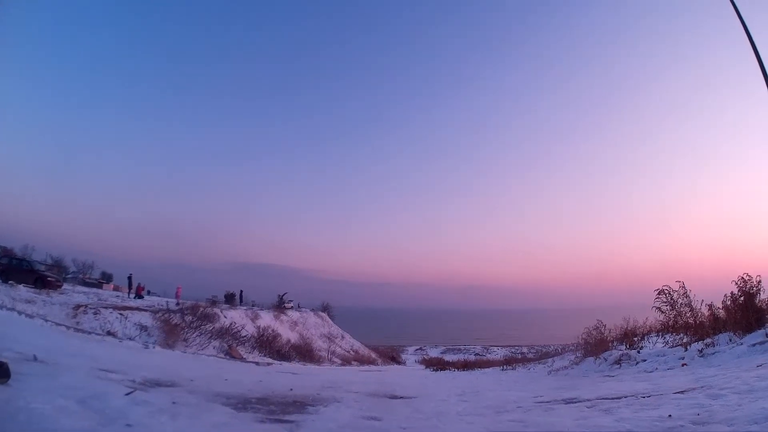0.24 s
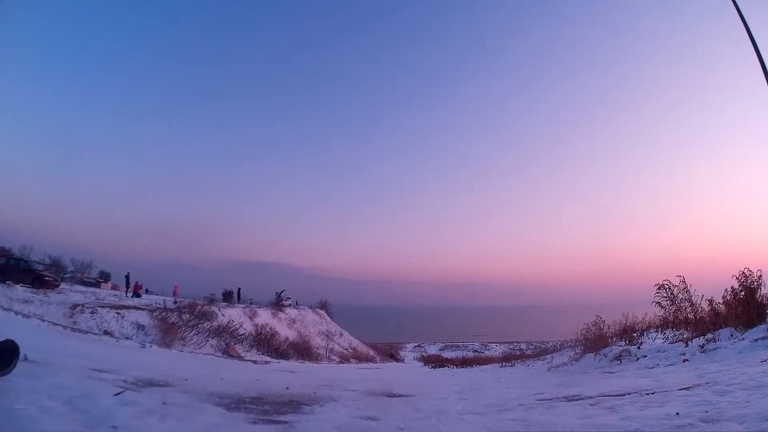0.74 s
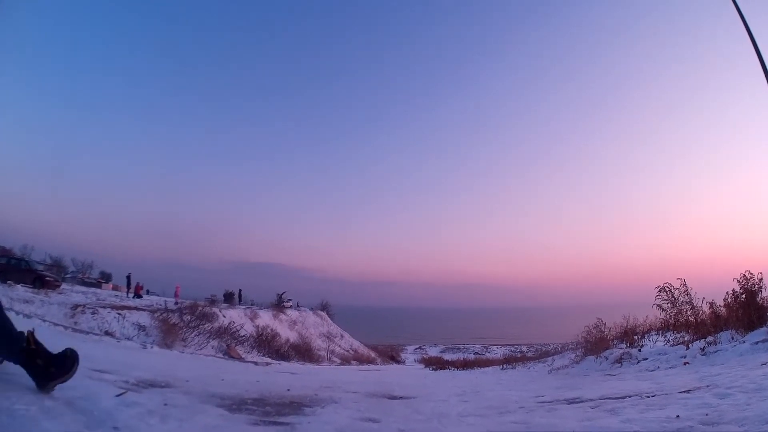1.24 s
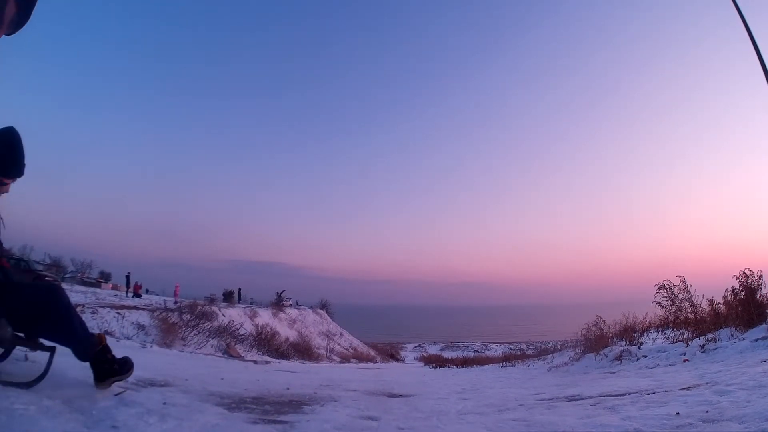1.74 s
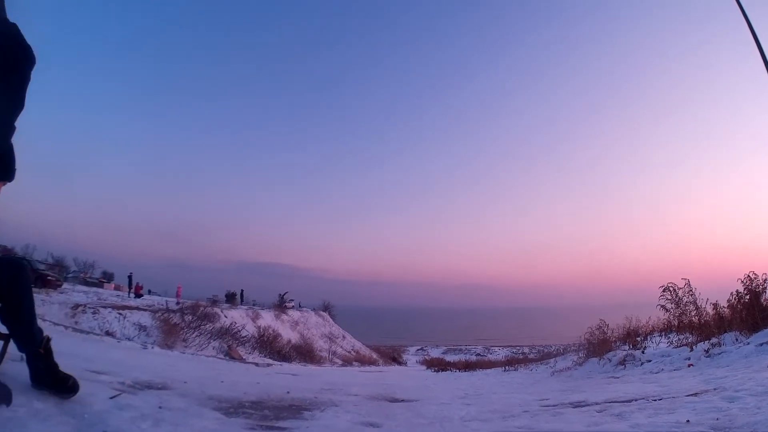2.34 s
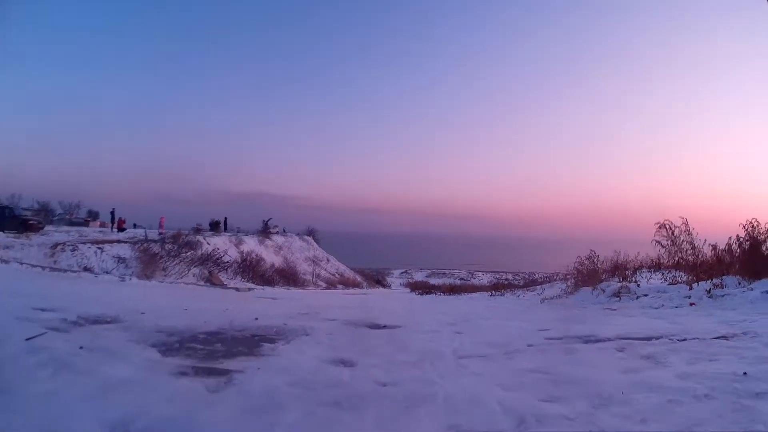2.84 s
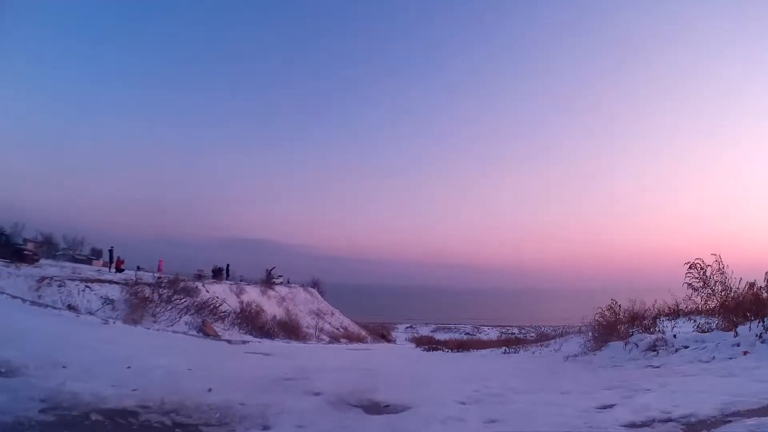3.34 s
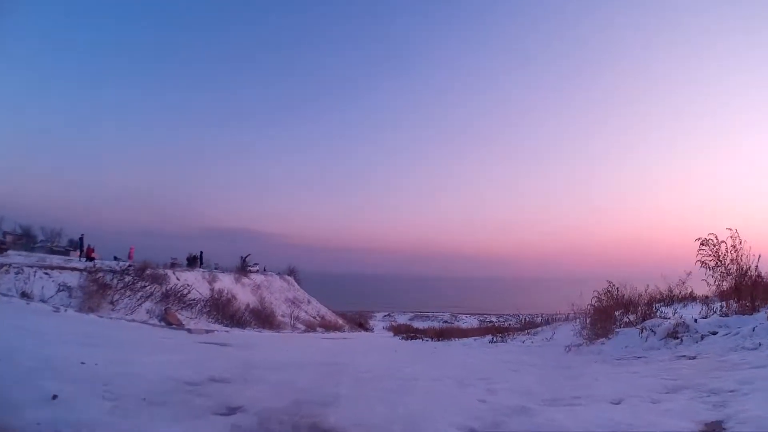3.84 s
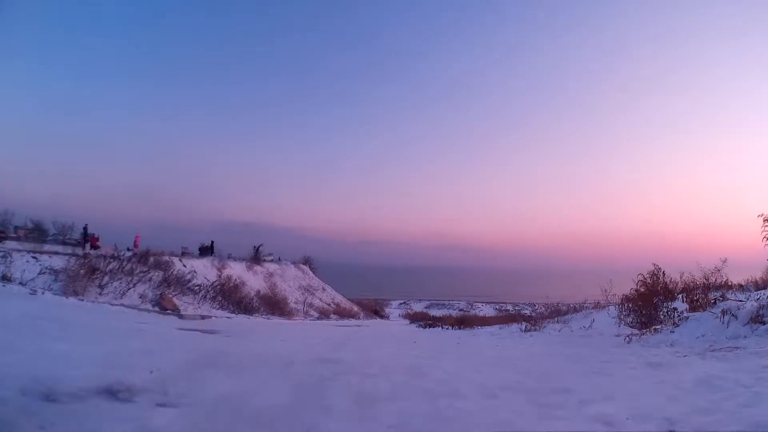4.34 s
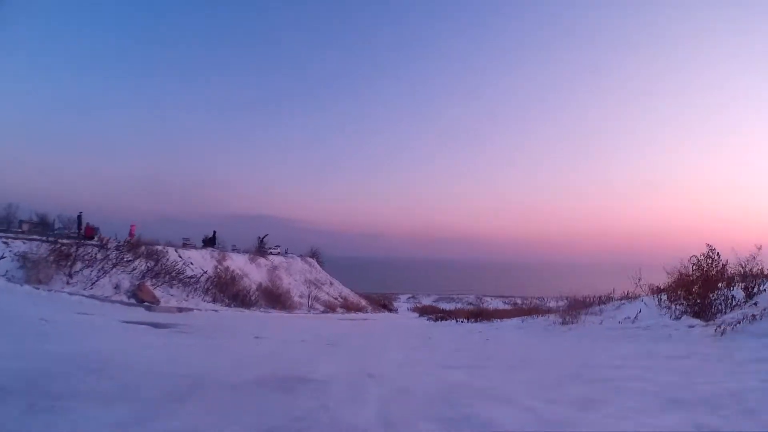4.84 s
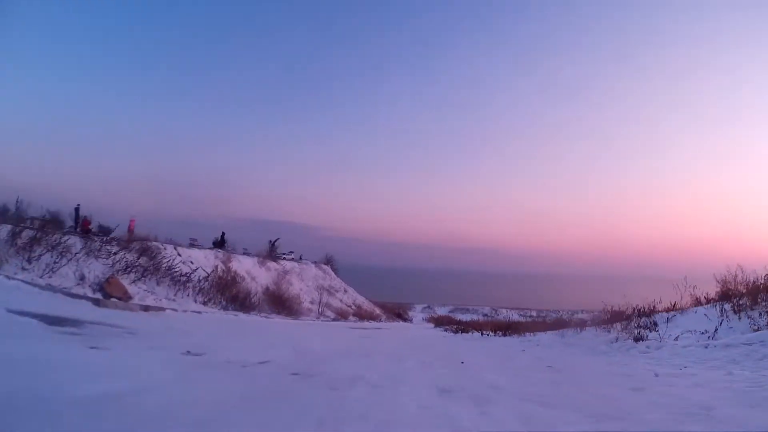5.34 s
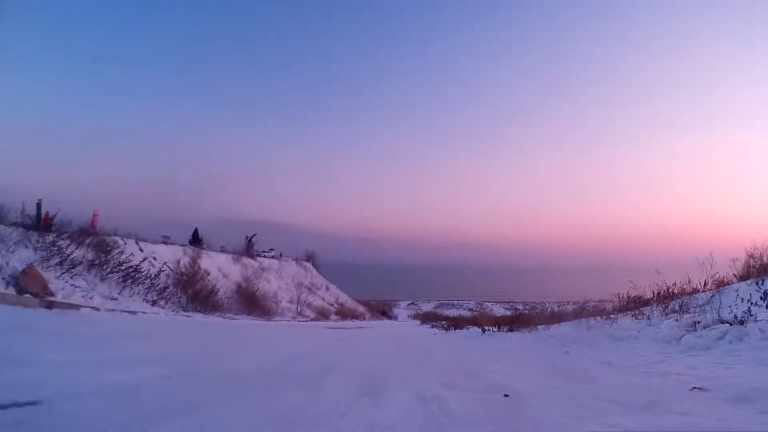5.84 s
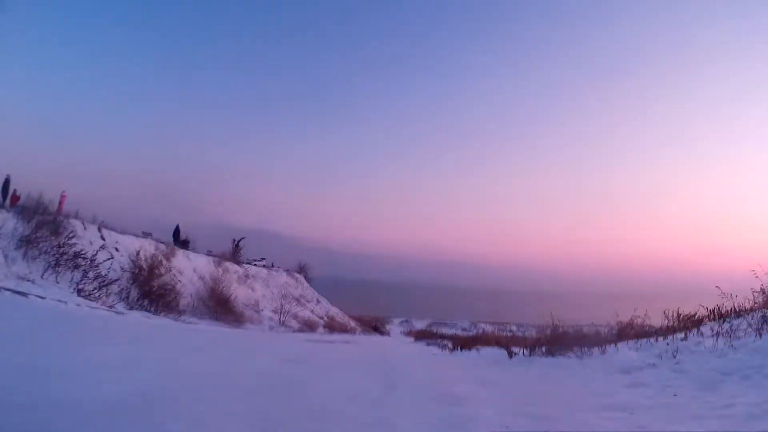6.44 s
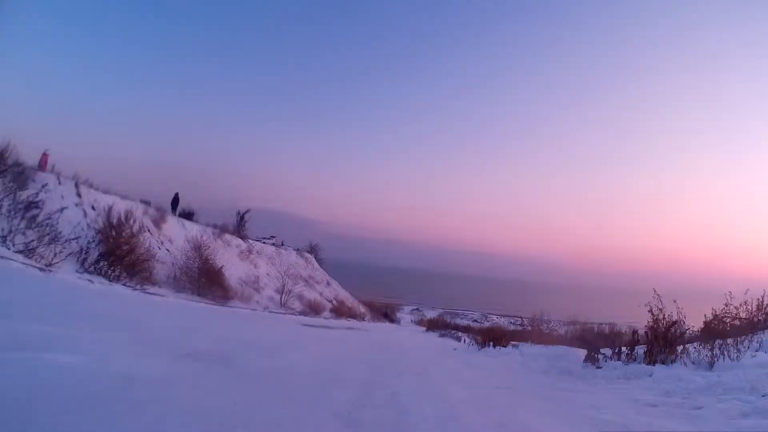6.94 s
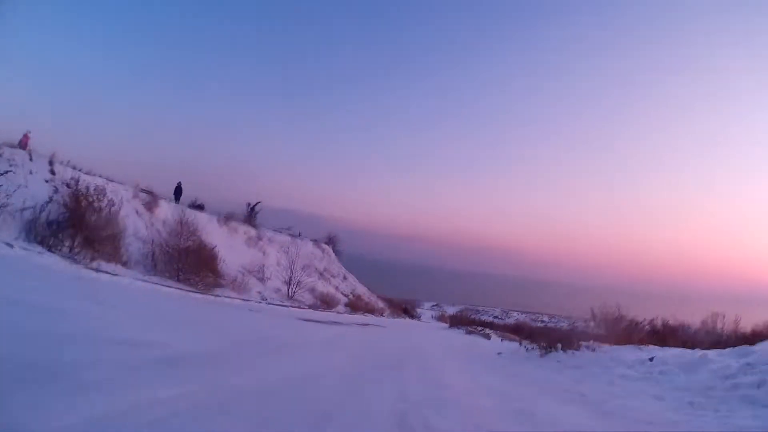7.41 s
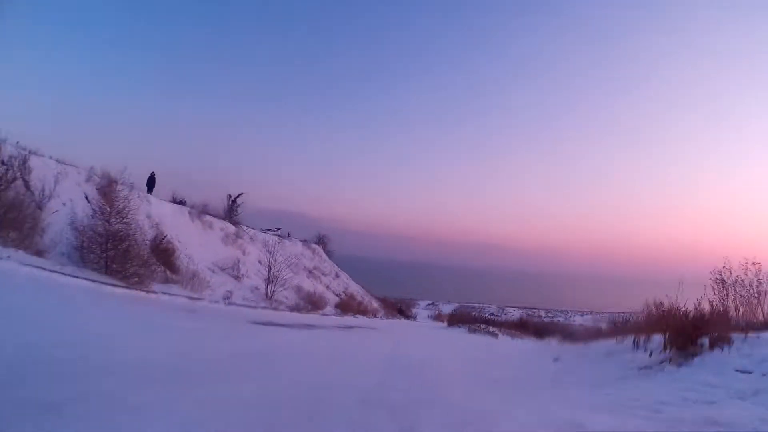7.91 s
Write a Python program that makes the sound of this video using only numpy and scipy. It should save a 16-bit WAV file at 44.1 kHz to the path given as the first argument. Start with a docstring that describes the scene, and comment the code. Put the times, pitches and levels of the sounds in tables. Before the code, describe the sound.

Dry, very close sound carried through a sled on packed snow. From 0 to 2.3 s it stands nearly silent: a crunchy double knock with a hollow low tone right at the start, a short scuff at 0.3, a small scrape at 0.7, a dull knock near 1.0, a tiny squeak at 1.2, soft low taps around 1.4 and 2.05, faint frame hum and hiss. At 2.4 s the push-off scrapes, dips, then swells into a coarse, creaky rasp peaking around 3.0. It drops by 3.35, and bumps begin. From 4 s crust lumps crunch and snap over the steady mid-pitched runner scrape, with low seat thumps, strong near 5.2. From 6 s to 8.2 s the run is rough and loud: flickering rasp, dense irregular crunches, heavy thumps, brief deep sway, gritty icy treble and bright overloaded splashes, cut off while still sliding.

```python
"""Runners rasp on packed snow: random grain fractures excite the resonances of a sled that carries the microphone.
The sled is nudged and knocked, pushed off at 2.3 s, and runs down a slope.
Lumps of crust crunch as bursts of fractures; ruts thump the seat as short enveloped sines, and light knocks
ring as decaying tones. Grinding ice adds treble, low sway swells briefly, and the hardest blows add a bright
splash as the microphone overloads."""
import sys
import numpy as np
from scipy import signal
from scipy.fft import rfft, irfft, next_fast_len
from scipy.io import wavfile
from scipy.ndimage import uniform_filter1d

SR = 44100
rng = np.random.default_rng(int(sys.argv[2]) if len(sys.argv) > 2 else 0)


def master(y):
    """Save y as 16-bit WAV."""
    cut = np.clip(np.atleast_2d(y).T, -1, 1)
    pcm = np.round(cut * 32767)  # scale
    wavfile.write(sys.argv[1], SR, pcm.astype(np.int16))


N = 360297
TIME = np.arange(N) / SR   # seconds

# Levels in the tables are relative: each body adds its own gain.
# Steady scrape, from standing through the push to the run: [time_s, level_db]
SCRAPE = [(0.0, -45), (0.62, -50.5), (0.86, -64.5), (1.1, -52), (1.5, -52), (1.7, -62), (2.17, -60.5),
          (2.38, -27.5), (2.54, -39.5), (2.72, -28.5), (3.0, -21), (3.22, -23.5), (3.34, -38),
          (4.45, -33.5), (5.3, -31.5), (6.6, -28), (8.17, -29.5)]
# Brightness and liveliness of the scrape, which mostly grows during the run: [time_s, liveliness_share]
LIVELINESS = [(0.0, 0.25), (0.62, 0.15), (0.72, 0.22), (0.85, 0.2), (2.2, 0.2), (3.0, 0.13), (4.0, 0.45),
              (5.0, 0.52), (6.5, 0.52), (8.17, 0.64)]
# Brief drags of the runners, when nudged or on a rough patch: [start_s, level_db, length_s]
RUNNER_DRAGS = [(0.303, -43.5, 0.24), (0.672, -35.5, 0.045), (0.973, -46.5, 0.055), (1.18, -44, .015),
                (2.582, -22.5, 0.022), (3.505, -21, 0.052), (4.66, -31.5, 0.19), (5.586, -22.5, 0.12),
                (6.056, -22, 0.035)]
# Knocks on the standing sled and big lumps under the running one:
# [start_s, crunch_db, crunch_length_s, deck_against_runners_db, thump_db]
KNOCKS_AND_BIG_LUMPS = [(0.008, -36.5, 0.019, -3, -15), (0.09, -33, 0.014, -5.5, -28),
                        (0.16, -58, 0.009, -5, -21), (0.962, -48.5, .006, -8, -22),
                        (0.984, -44.5, .005, 2.5, -23.5), (1.412, -47, .008, -7, -38.5),
                        (1.444, -39, .01, -10, -48), (2.003, -45.5, 0.003, 3, -15.5),
                        (2.049, -45, 0.024, -4.5, -26.5), (2.423, -38, 0.0068, -5, -16.5),
                        (2.862, -17.5, 0.01, -5.5, -30.5), (3.289, -34, 0.006, 0, -13),
                        (3.45, -31, 0.019, -5, -8), (3.496, -22.5, 0.003, 0.5, -26),
                        (3.563, -21, .028, -2.5, -25), (3.763, -23, 0.0033, -11, -19.5),
                        (3.842, -33.5, .005, 3.5, -16), (3.969, -33, 0.025, 1.5, -14.5),
                        (4.048, -26, 0.015, -4.5, -15), (4.082, -21.5, 0.062, -4.5, -26),
                        (4.127, -12, 0.0065, -3, -21), (4.18, -13.5, 0.016, -13.5, -8),
                        (4.402, -22.5, 0.023, -4, -20.5), (4.553, -24.5, .023, 1, -16.5),
                        (4.595, -21.5, 0.028, -9, -14.5), (4.663, -21.5, .013, -7.5, -13.5),
                        (4.734, -18, .01, -12.5, -13.5), (4.861, -19, 0.0034, 7.5, -6.5),
                        (4.932, -27, 0.017, -8, -21), (4.982, -30.5, 0.0055, -5, -11),
                        (5.051, -22, 0.0028, 3, -20), (5.076, -19.5, 0.026, -4, -26),
                        (5.192, -14, 0.012, -9.5, -2), (5.272, -13.5, 0.0041, -3.5, -4.5),
                        (5.527, -18.5, 0.024, -7, -6), (5.784, -25.5, 0.0027, -15, -28),
                        (5.916, -22.5, 0.0077, -3.5, -6.5), (5.985, -23, .004, -1, -17),
                        (6.02, -23.5, 0.053, -3.5, -9.5), (6.106, -13.5, 0.0052, -10.5, -12.5),
                        (6.195, -35, 0.0044, -14, -6), (6.26, -26, .008, -11, -9),
                        (6.348, -18, 0.0032, 0, -13), (6.376, -21, 0.051, -2.5, -6.5),
                        (6.481, -10, 0.0051, -7.5, -5), (6.56, -27, 0.0034, 10, -9),
                        (6.616, -16.5, 0.034, -6.5, -13), (6.656, -11.5, 0.0041, -5.5, -3.5),
                        (6.774, -13.5, 0.019, -9.5, -8), (6.822, -10.5, 0.0033, -3.5, -21),
                        (6.879, -25.5, .01, -2.5, -12), (6.931, -21, 0.021, -4, -9),
                        (7.012, -21, .004, 1, -12), (7.065, -15.5, 0.013, -4, -13.5),
                        (7.12, -22, 0.03, -5.5, -7.5), (7.174, -17, 0.0096, -3.5, 0.5),
                        (7.227, -34.5, 0.015, 5, -8), (7.284, -16.5, 0.0053, -3.5, -18.5),
                        (7.314, -21, 0.01, -4.5, -27), (7.42, -16, .016, -1, 1),
                        (7.55, -20, 0.011, -0.5, -10.5), (7.643, -17, 0.0051, 0, -16),
                        (7.669, -19.5, 0.017, -3, -26), (7.701, -10.5, 0.0041, -9.5, -8.5),
                        (7.809, -32, .012, 0, -6.5), (7.846, -15.5, 0.0027, -0.5, -3.5),
                        (7.931, -14, 0.0053, -9, -4), (8.02, -24, 0.0047, 5, -12.5),
                        (8.155, -22.5, 0.0042, 8.5, -26)]
# Light knocks and a squeak on the standing sled: [start_s, level_db (before decay), pitch_hz, t60_s]
LIGHT_KNOCKS = [(0.147, -21.5, 224, 0.24), (0.561, -43, 88, 0.84), (0.698, -54, 220, 0.15),
                (0.987, -29, 228, 0.24), (1.178, -29.5, 1250, 0.054), (1.18, -53, 733, 0.7),
                (1.29, -45, 100, 0.29), (1.409, -30, 85, 0.24), (1.533, -39, 79, 0.55),
                (1.533, -30, 217, 0.2), (2.06, -26.5, 87, 0.22)]
# Low sway near 43 Hz, swelling briefly at irregular moments, often around knocks: [start_s, level_db, length_s]
SWAY_SWELLS = [(0.01, -32.5, 0.18), (0.296, -42.5, 0.16), (0.97, -30.5, .04), (2.034, -36, 0.042),
               (2.41, -32, .05), (2.87, -30, 0.33), (3.47, -25, 0.072), (3.958, -25.5, 0.057),
               (4.307, -27.5, 0.069), (4.6, -27.5, 0.13), (5.5, -21, 0.037), (6.311, -19.5, 0.069),
               (6.65, -22.5, .04), (7.24, -18.5, 0.042), (7.416, -22, .03), (7.67, -19, 0.043),
               (7.93, -21.5, 0.073)]
# Ringing of the unloaded frame against the scrape: [time_s, level_db]
UNLOADED_FRAME = [(0.0, 3), (0.5, -2), (0.75, 3), (1.2, -9.5), (1.9, -2), (2.3, -2), (2.7, -16.5)]

# Resonances of the runners: [centre_hz, width_hz, level_db]
RUNNER_MODES = [(1134, 35, -12.5), (1214, 51, -5), (1310, 85, -2.5), (1425, 75, -1), (1577, 96, -1.5),
                (1612, 97, 0.5), (1737, 45, 1), (1807, 84, -8.5), (1960, 73, -18.5), (2123, 43, -21),
                (2554, 124, -22.5), (2905, 270, -28.5), (3460, 62, -29)]
# Resonances of the deck: [centre_hz, width_hz, level_db]
DECK_MODES = [(349, 91, -15), (501.4, 33.7, -0.5), (546, 56, -4.5), (654.4, 81, -6), (702.6, 38.5, -7),
              (861, 65, -17), (920, 40, -23.5)]
# Upper resonances of the runner tubes: [centre_hz, width_hz, level_db]
TUBE_MODES = [(2660, 210, 6.5), (2990, 120, 3.5), (3463, 350, 1.5), (4610, 190, -11.5), (5130, 250, -7),
              (5830, 400, -13)]
# Treble bands of fine grinding, ticking and overload clicks: [centre_hz, width_hz, level_db]
TREBLE_BANDS = [(3560, 1400, 5.5), (5220, 720, -2), (7330, 1460, -6), (9840, 1670, -9.5),
                (14500, 3100, -23.5)]
# Resonances that slow stick-slip sets singing: [centre_hz, width_hz, level_db]
CREAK_MODES = [(609, 140, -0.5), (718, 56, 1.5), (860, 55, -16.5), (943, 35, -9.5), (2660, 103, -14),
               (3720, 110, -26.5)]
# Hum of the empty frame until a rider's weight damps it: [centre_hz, width_hz, level_db]
HUM_MODES = [(221.8, 24, 0.5), (522, 9.1, -21.5), (586, 9, -30), (720.5, 22, -15.5), (1300, 19, -6.5),
             (1390, 11.3, -11.5), (1756, 94, -10.5)]
# Resonances of the seat: [centre_hz, width_hz, level_db]
SEAT_MODES = [(85.8, 32.6, 0.5), (120.2, 27.4, 0), (180.5, 94, -3.5), (194.2, 25.6, 2), (290, 174, -19)]
# The sled swaying on its runners: [centre_hz, width_hz, level_db]
SWAY_MODES = [(43.2, 13.7, 10.5), (64, 37, -11.5)]

# Small lumps come at random once the sled runs; relative levels at liveliness 1, lower below it
RUN_START_S, LUMPS_PER_S = 2.7, 9
LUMP_CRUNCH_DB, LUMP_THUMP_DB, LUMP_SPREAD_DB, LUMP_LIVELINESS_DB = -27, -16, 2.0, 9.5
LUMP_LENGTH_S, LUMP_DEPTH_DB = 0.0049, -4   # typical length; deck against runners
LUMP_OVER_SCRAPE_DB = 2.5   # least crunch above the scrape table, before the random spread
# A runner rides up each lump just before it gives way
LEAD_IN_S, LEAD_IN_DB = 0.011, -15.5
# Overload clicks reach full level above this force; for weaker blows they fall away steeply (dB per dB)
CLICK_FORCE_DB, CLICK_DB, CLICK_SLOPE, CLICK_LAG_S, CLICK_S = -1, -25, 2.07, 0.0022, 0.0032
# Seat pitch at liveliness 0, its drop at liveliness 1, and its random scatter as a log ratio
THUMP_HZ, THUMP_SAG_HZ, THUMP_SCATTER = 204, 43, 0.049
SHUDDER_LAG_S = 0.017
HISS_DB, OVERLOAD, CUTOFF_HZ = -71.5, .7, 15750   # hiss rms and clipping amplitude re full scale 1


def runners(glide, crush):
    """Forced resonance: gliding and crushing fractures both make the runners rasp."""
    pressure = np.hypot(from_db(-4.0) * glide, from_db(1.5) * crush)
    force = reflected(grains(per_s=2200, spread_db=3.5), delay_s=.0022, wander_db=3.0, share=0.67)
    return rub(pressure, RUNNER_MODES, force, span_s=0.019)


def small_lumps(liveliness):
    """Random impacts: minor lumps lie unevenly along the run, stronger with liveliness; columns as for the big lumps."""
    chance = rng.standard_normal((120, 4))
    s = RUN_START_S + (np.arange(len(chance)) + .4 * chance[:, 0]) / LUMPS_PER_S
    calmer_db = LUMP_LIVELINESS_DB * (np.interp(s, TIME, liveliness) - 1)
    pressed_db = np.interp(s, *np.transpose(SCRAPE)) + LUMP_OVER_SCRAPE_DB
    crunch_db = np.maximum(LUMP_CRUNCH_DB + calmer_db, pressed_db) + LUMP_SPREAD_DB * chance[:, 1]
    thump_db = LUMP_THUMP_DB + calmer_db + LUMP_SPREAD_DB * chance[:, 2]
    length = LUMP_LENGTH_S * np.exp(.5 * chance[:, 3])
    depth_db = np.full(len(s), LUMP_DEPTH_DB)
    return np.column_stack([s, crunch_db, length, depth_db, thump_db])[s < TIME[-1]]


def deck(glide, deck_push, liveliness):
    """Structural transmission: lumps reach up into the hollow deck, which feels a lively glide slightly more."""
    pressure = np.hypot(from_db(-10.5 + 1.1 * liveliness) * glide, from_db(0.95) * deck_push)
    force = reflected(grains(per_s=1400, spread_db=2.5), delay_s=.0032, wander_db=3.0, share=0.61)
    return rub(pressure, DECK_MODES, force, span_s=0.026)


def crystals(glide, crush, liveliness, unloaded):
    """Fracture noise: grinding ice rings the tubes, most freely when empty; returns tubes and treble force."""
    load = np.hypot(glide, from_db(1.0) * crush)
    force = reflected(grains(per_s=4000, spread_db=0.0), delay_s=.0015, wander_db=3.0, share=0.36)
    freedom = np.hypot(1, from_db(4.5) * unloaded)
    tubes = resonate(from_db(-28.5) * load * freedom * force, TUBE_MODES)
    # liveliness strengthens both the grinding and the ticking spray
    grind = from_db(-29.5) * load * liveliness * grains(per_s=1400, spread_db=2.0)
    spray_level = from_db(-53.5) * liveliness ** 3 * from_db(4.5 * drift(12))
    spray = spray_level * grains(per_s=140, spread_db=3.0)
    return tubes, grind + spray


def overload_clicks(jolts):
    """Overload: the hardest blows add a short bright splash as the microphone overloads; fine ticks follow any blow."""
    s, crunch_db, length, _, thump_db = jolts.T
    force_db = 20 * np.log10(2 * from_db(crunch_db) + from_db(thump_db))
    click_db = CLICK_DB + CLICK_SLOPE * np.minimum(force_db - CLICK_FORCE_DB, 0)
    click_s = s + length / 2 + CLICK_LAG_S
    click = bursts(click_s, click_db, CLICK_S, rise_s=.0012, release_s=.00095)
    ticks = bursts(s, -56.5 + 0.47 * force_db, 0.045, rise_s=.012, release_s=.014)
    splash = from_db(-12.5) * click * grains(per_s=4100, spread_db=0.0)
    return splash + ticks * grains(per_s=200, spread_db=5.1)


def creak(glide, liveliness):
    """Stick-slip friction: cold snow catches a slow runner; this fades as the scrape grows lively."""
    sticking = from_db(-7.0 - 19.3 * liveliness)
    return rub(glide * sticking, CREAK_MODES, grains(per_s=900, spread_db=3.0), span_s=.03)


def thumps(jolts, liveliness, rise_s):
    """Impulsive flexure: each jolt bends the seat for a few cycles at a nearly constant pitch, then it rings faintly."""
    out, age = np.zeros(N), TIME[:SR // 8]
    swell = (age / rise_s * np.exp(1 - age / rise_s)) ** 2.75
    scatter = np.exp(THUMP_SCATTER * rng.standard_normal(size=200))
    for (s, *_, db), detune in zip(jolts, scatter):
        hz = (THUMP_HZ - THUMP_SAG_HZ * np.interp(s, TIME, liveliness)) * detune
        add(out, s, from_db(db - 3.0) * swell * np.sin(2 * np.pi * hz * age))
    ring = signal.lfilter(*signal.iirpeak(221, 22, fs=SR), out)
    return out + from_db(-6.5) * ring


def ringing(rise_s):
    """Damped free vibration: lightly struck parts die away as single tones."""
    out, age = np.zeros(N), TIME[:SR]
    for s, db, hz, t60 in LIGHT_KNOCKS:
        envelope = from_db(db - 60 * age / t60) * (1 - np.exp(-age / rise_s))
        add(out, s, envelope * np.sin(2 * np.pi * hz * age))
    return out


def hum(glide, unloaded):
    """Light damping: the unloaded frame rings along with the slightest scrape."""
    return rub(glide * unloaded, HUM_MODES, grains(per_s=2800, spread_db=2.0), span_s=0.04)


def rumble(glide, liveliness, deck_push, jolts):
    """Low-frequency forcing: uneven snow shakes the seat, which shudders after each jolt; low sway swells briefly."""
    s, thump_db = jolts[:, 0], jolts[:, -1]
    shudder = bursts(s + SHUDDER_LAG_S, -13.5 + 1.11 * thump_db, 0.013, rise_s=.008, release_s=0.013)
    glide_shake = from_db(0.5) * glide * liveliness ** .5
    shake = np.sqrt(glide_shake ** 2 + shudder ** 2 + (from_db(-1.0) * deck_push) ** 2)
    swells = bursts(*np.transpose(SWAY_SWELLS), rise_s=0.017, release_s=0.057)
    sway = np.hypot(from_db(-1.5) * glide ** 0.74 * liveliness ** 1.35, swells)
    seat = rub(shake, SEAT_MODES, grains(per_s=300, spread_db=4.5), span_s=0.058)
    return seat + rub(sway, SWAY_MODES, grains(per_s=340, spread_db=-0.3), span_s=0.18)


def grains(per_s, spread_db):
    """Shot noise: tiny impulses of either sign at random moments, of unequal strength; unit power."""
    sizes = from_db(spread_db * np.minimum(rng.exponential(1, N), 4))
    return rms_one(sizes * rng.choice([-1, 1], N) * (rng.random(N) < per_s / SR))


def reflected(force, delay_s, wander_db, share):
    """Comb interference: echoes from the runner's end color the force as the contact point moves; unit power."""
    lag = delay_s * SR * from_db(wander_db * drift(11))
    earlier = np.clip(np.arange(N) - lag, 0, N - 1).astype(int)
    return rms_one(force + share * force[earlier] + share ** 2 * force[earlier[earlier]])


def rub(level, modes, force, span_s):
    """Energy balance: grains excite a body with about the same energy in every short span."""
    size = int(span_s * SR)
    # the averaging window leans towards later samples
    energy = uniform_filter1d(resonate(force, modes) ** 2, size, origin=-(size // 4))
    return resonate(level * force / np.sqrt(np.abs(energy) + 0.077), modes)


def resonate(force, modes):
    """Modal filtering: a force passes through steep-sided resonances; white noise keeps its power."""
    size = 2 * next_fast_len(N // 2 + SR // 2)
    hz = np.arange(size // 2 + 1) * SR / size
    power = np.zeros(len(hz))
    for centre, width, db in modes:
        # the factor makes width the full width at half power
        power += (from_db(db) / (1 + ((hz - centre) / (.78 * width)) ** 2)) ** 2
    # minimum phase: the body rings only after it is pushed
    cepstrum = irfft(np.log(power / power.mean() + 1e-14) / 2)
    cepstrum[1:size // 2] *= 2
    cepstrum[size // 2 + 1:] = 0
    return irfft(rfft(force, size) * np.exp(rfft(cepstrum)))[:N]


def bursts(starts, levels_db, lengths, rise_s, release_s):
    """Burst envelope: each burst rises, holds until its length is over and lets go; overlaps add in power."""
    power, age = np.zeros(N), TIME[:SR // 2]
    for s, db, length in np.broadcast(starts, levels_db, lengths):
        shape = np.minimum(age / rise_s, 1) * np.exp(-np.maximum(age - length, 0) / release_s)
        add(power, s, (from_db(db) * shape) ** 2)
    return np.sqrt(power)


def drift(rate):
    """Low-pass noise: smooth chance of unit power that changes about rate times a second."""
    hz = np.arange(N // 2 + 1) * SR / N
    return rms_one(irfft(rfft(rng.standard_normal(N)) / (1 + (hz / rate) ** 2), N))


def from_db(db):
    """Logarithmic level: decibels to amplitude gain."""
    return 10 ** (np.asarray(db) / 20)


def rms_one(x):
    """Normalization: scale to unit power."""
    return x / np.sqrt(np.mean(x ** 2) + 1e-20)


def in_time(rows):
    """Linear interpolation: the second column of a table at every sample."""
    s, values = np.transpose(rows)
    return np.interp(TIME, s, values)


def add(track, s, sound):
    """Superposition: mix a sound into a track from time s on."""
    start = int(np.clip(round(s * SR), 0, N - 1))
    track[start:start + len(sound)] += sound[:N - start]


def scene():
    """Structure-borne sound: all sources add at the microphone on the sled, with no room around it."""
    liveliness, unloaded = in_time(LIVELINESS), from_db(in_time(UNLOADED_FRAME))
    flutter = drift(31) * np.sqrt(liveliness)   # a lively scrape flickers in level
    drag = bursts(*np.transpose(RUNNER_DRAGS), rise_s=0.021, release_s=0.024)
    scrape = np.hypot(from_db(in_time(SCRAPE)), drag)
    glide = scrape * from_db(4.2 * (flutter - .3 * liveliness))

    jolts = np.vstack([KNOCKS_AND_BIG_LUMPS, small_lumps(liveliness)])
    s, crunch_db, length, depth_db, _ = jolts.T
    lead_in = bursts(s - LEAD_IN_S, crunch_db + LEAD_IN_DB, LEAD_IN_S, rise_s=0.0088, release_s=.003)
    crush = np.hypot(lead_in, bursts(s, crunch_db, length, rise_s=0.0027, release_s=0.0051))
    deck_push = bursts(s, crunch_db + depth_db, length, rise_s=0.0012, release_s=0.0047)

    snow = runners(glide, crush) + deck(glide, deck_push, liveliness)
    tubes, grinding = crystals(glide, crush, liveliness, unloaded)
    treble = resonate(grinding + overload_clicks(jolts), TREBLE_BANDS)
    snow += tubes + treble + creak(glide, liveliness)
    body = thumps(jolts, liveliness, rise_s=0.006) + ringing(rise_s=0.0033)
    body += rumble(glide, liveliness, deck_push, jolts) + hum(glide, unloaded)
    return (snow + body)[None]


def record(dry):
    """Transducer limits: the microphone drops deep bass, hisses and clips the highest peaks; the top is cut."""
    sound = signal.sosfilt(signal.butter(4, 27, "high", fs=SR, output="sos"), dry)
    hiss = from_db(HISS_DB) * rng.standard_normal(dry.shape)
    sound = np.clip(sound + hiss, -OVERLOAD, OVERLOAD)
    return signal.sosfilt(signal.ellip(10, .2, 80, CUTOFF_HZ, fs=SR, output="sos"), sound)


dry = scene()
out = record(dry)
master(out)
```